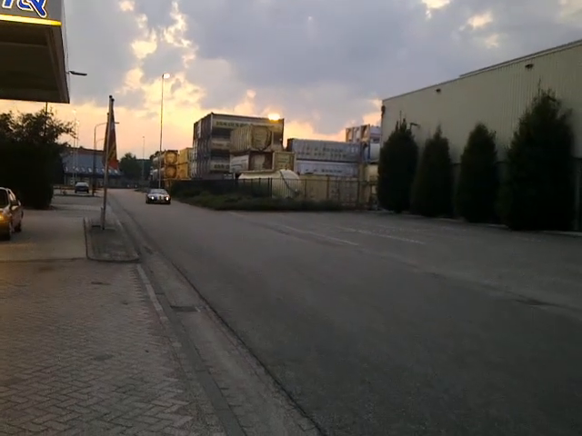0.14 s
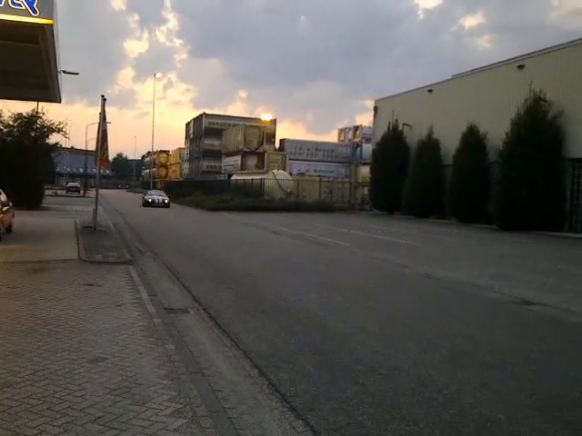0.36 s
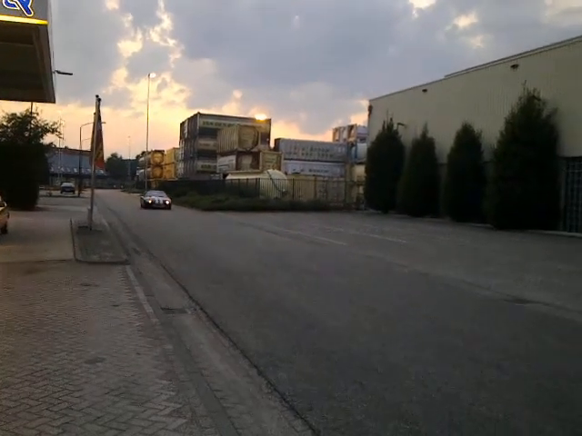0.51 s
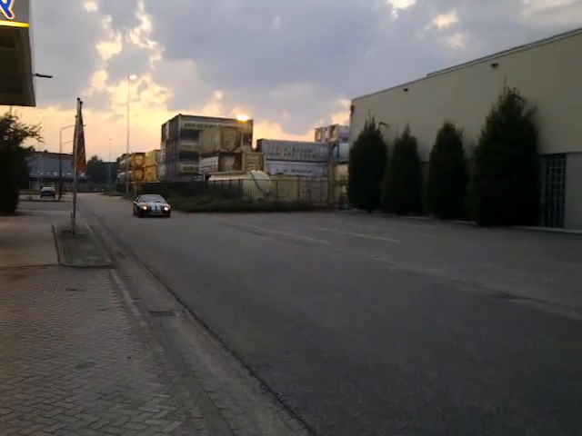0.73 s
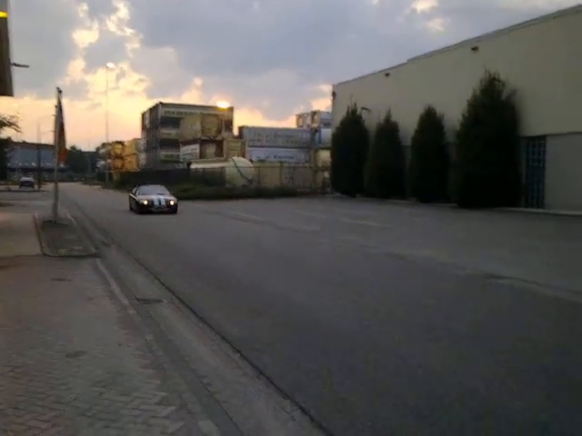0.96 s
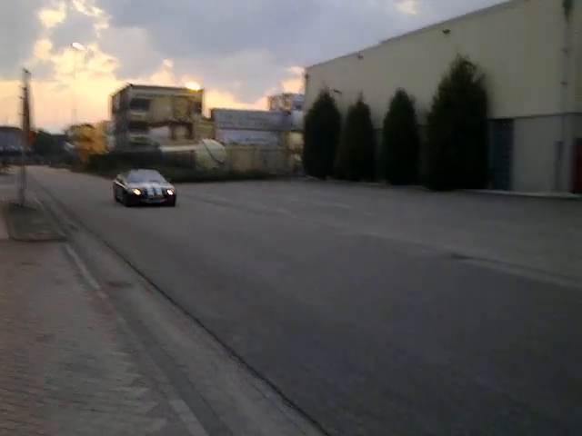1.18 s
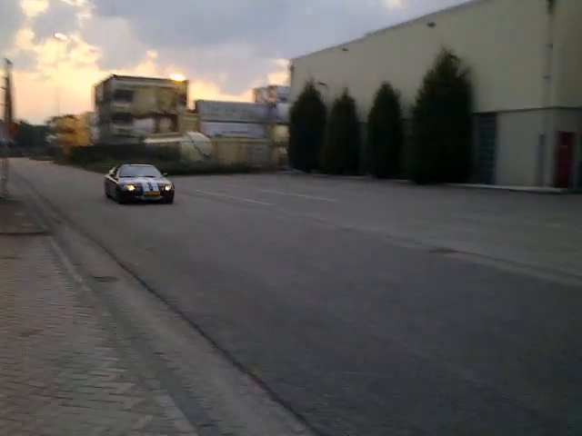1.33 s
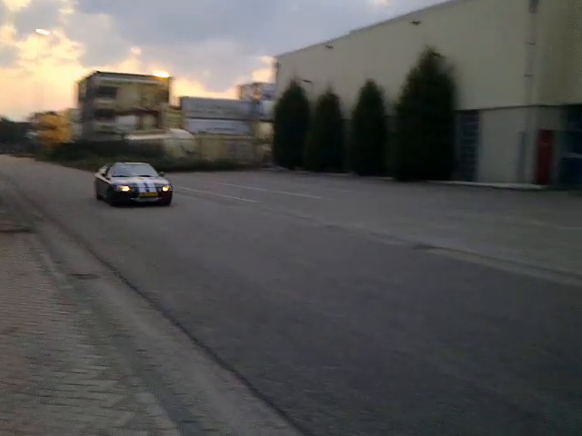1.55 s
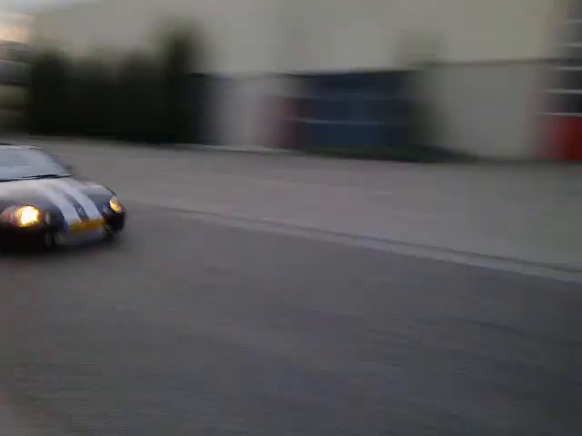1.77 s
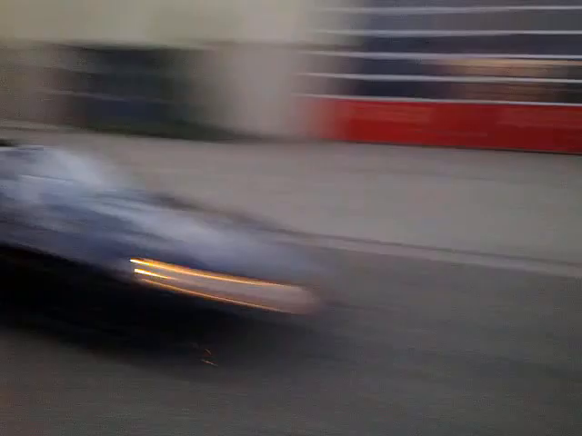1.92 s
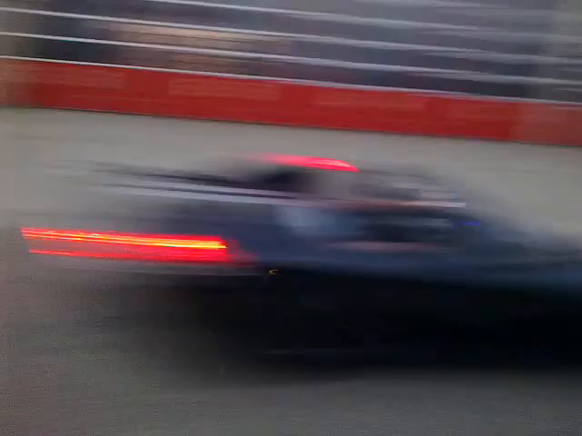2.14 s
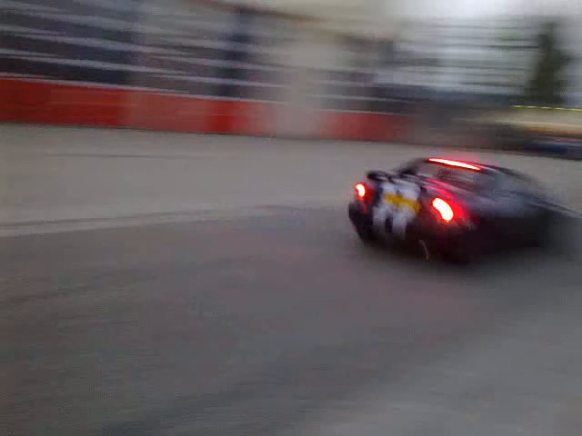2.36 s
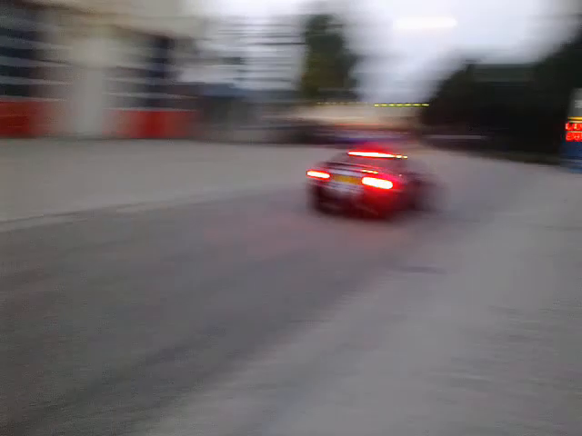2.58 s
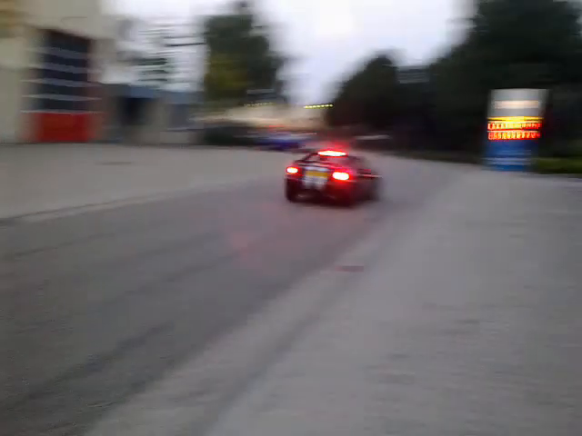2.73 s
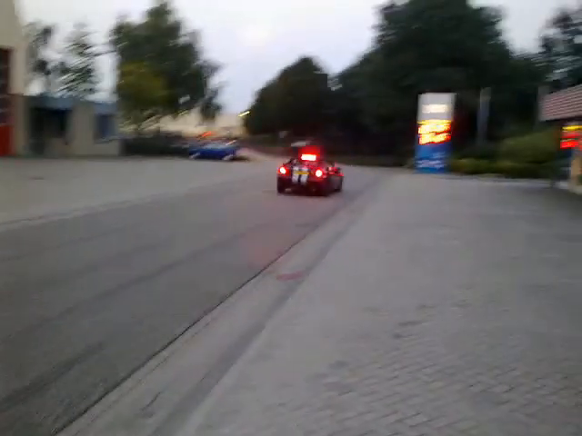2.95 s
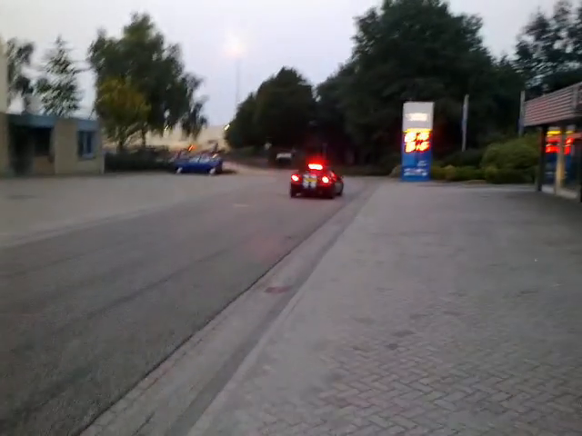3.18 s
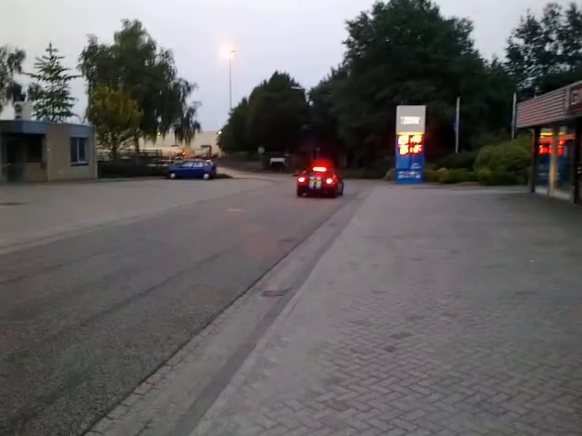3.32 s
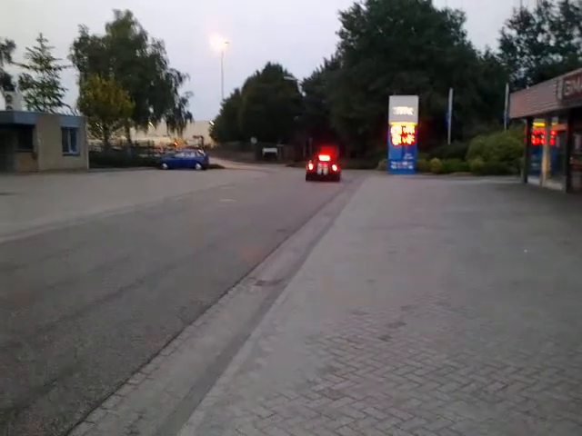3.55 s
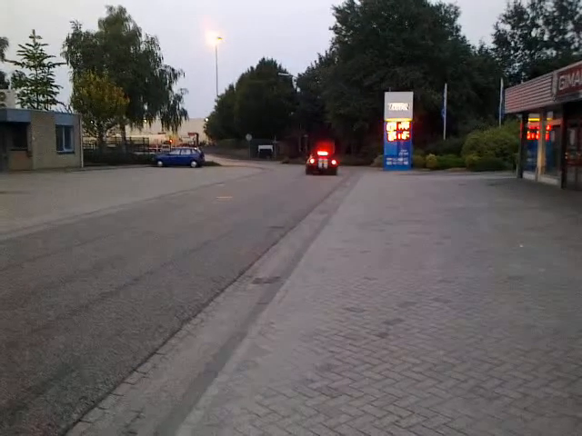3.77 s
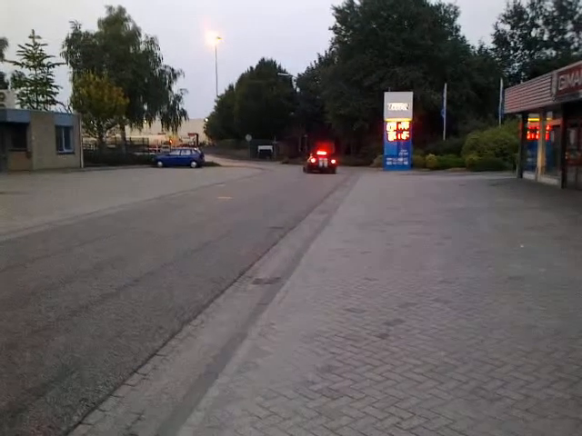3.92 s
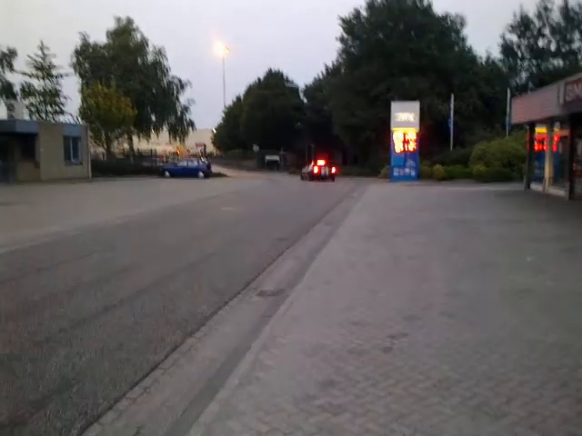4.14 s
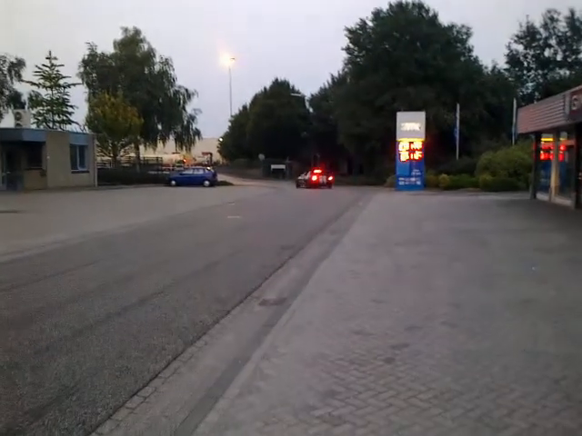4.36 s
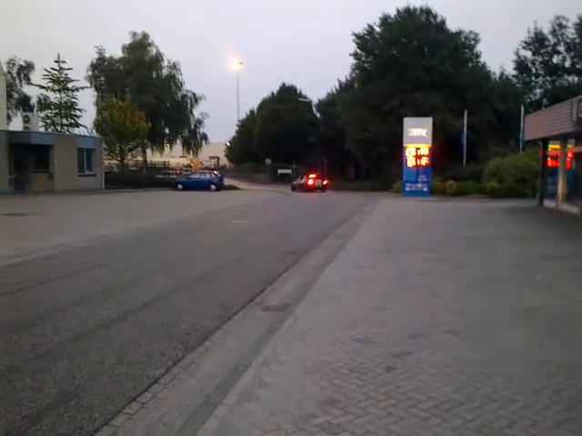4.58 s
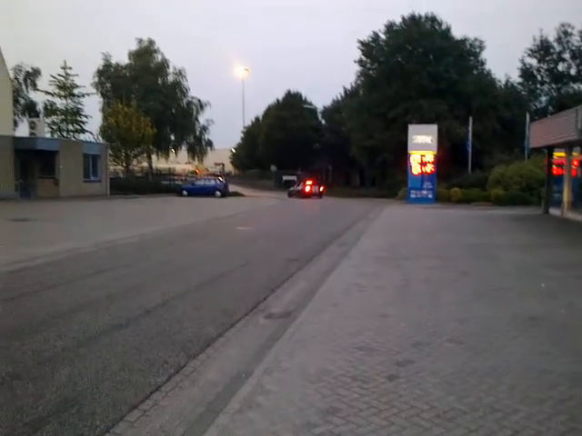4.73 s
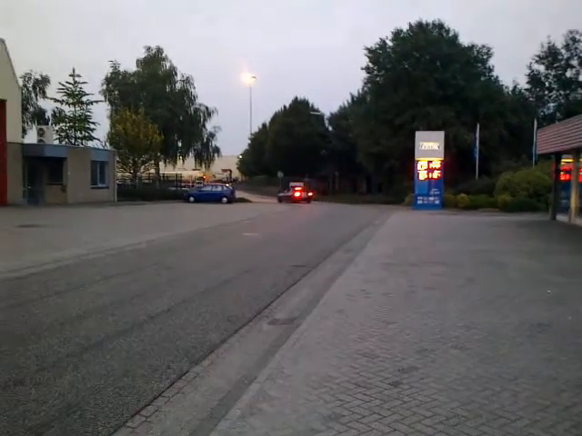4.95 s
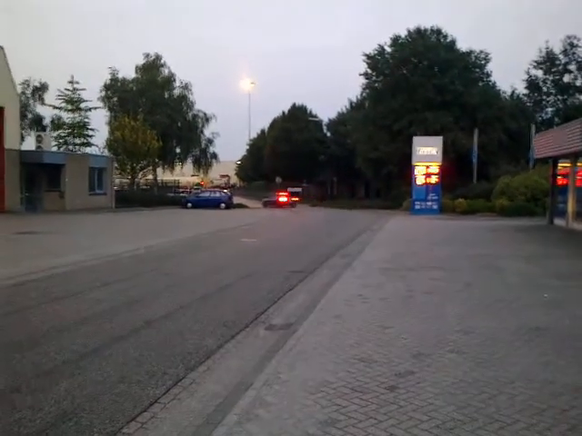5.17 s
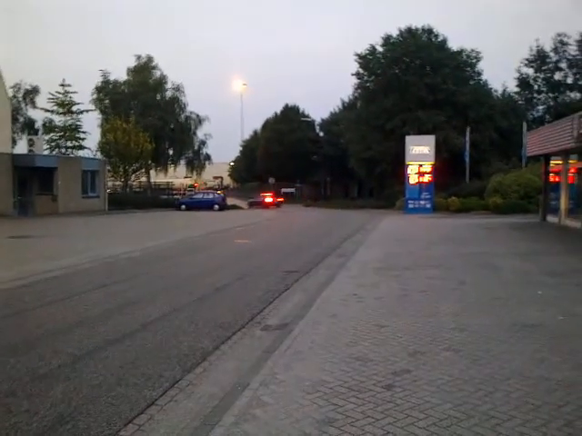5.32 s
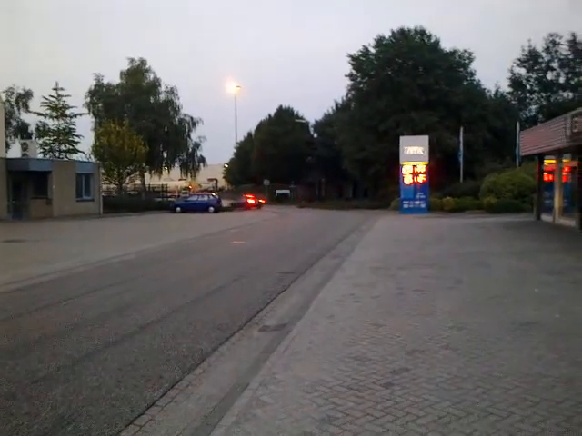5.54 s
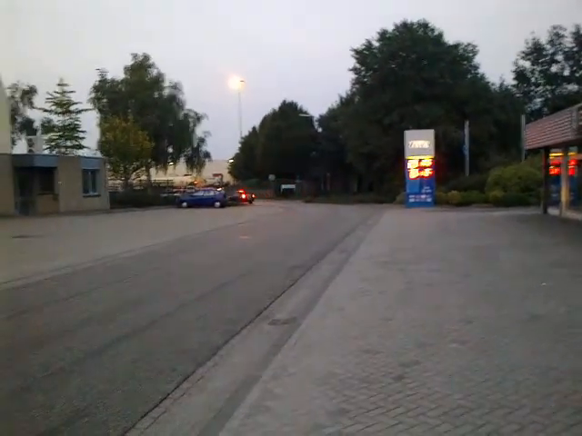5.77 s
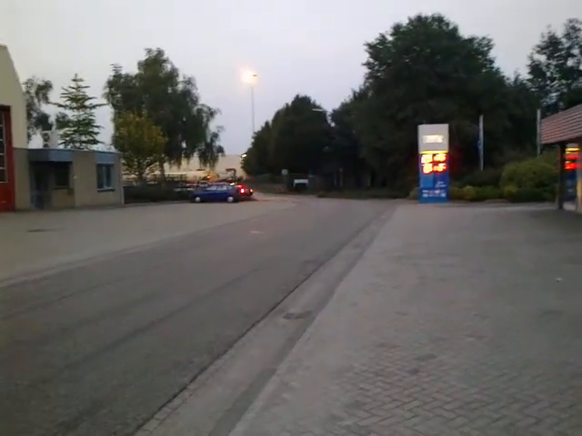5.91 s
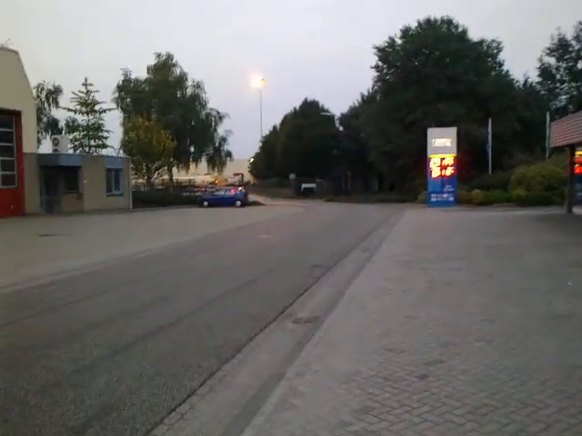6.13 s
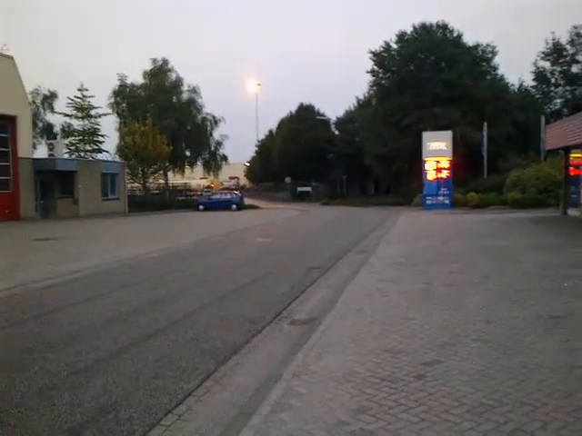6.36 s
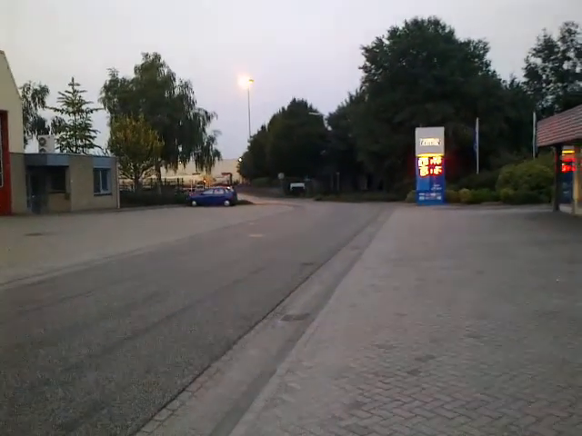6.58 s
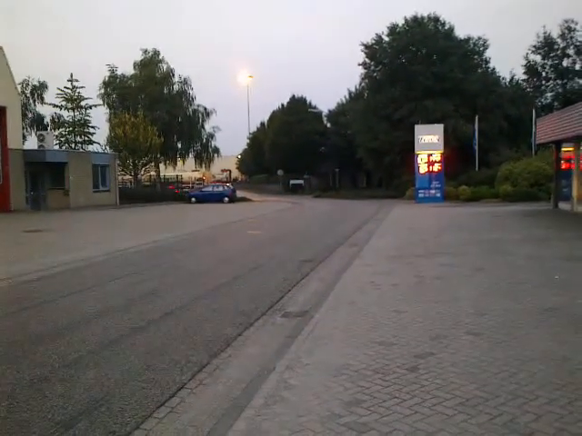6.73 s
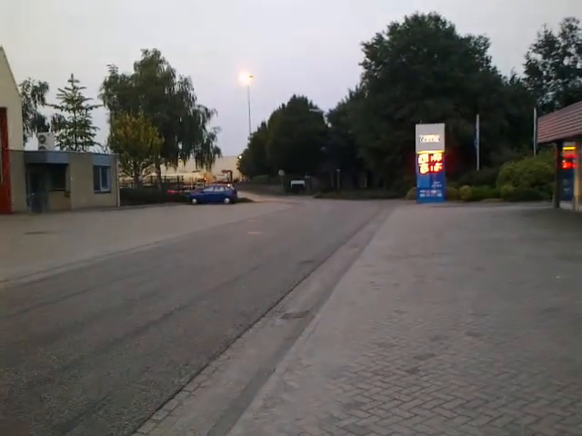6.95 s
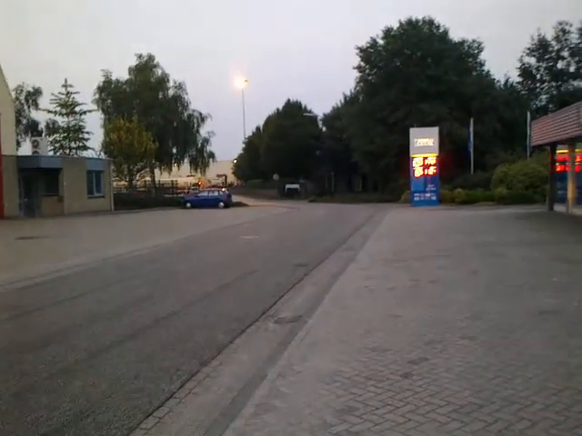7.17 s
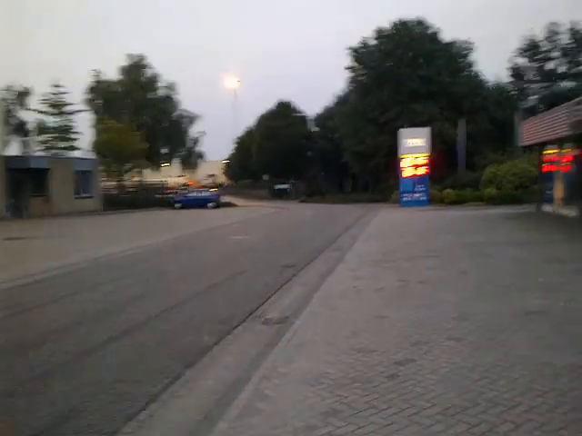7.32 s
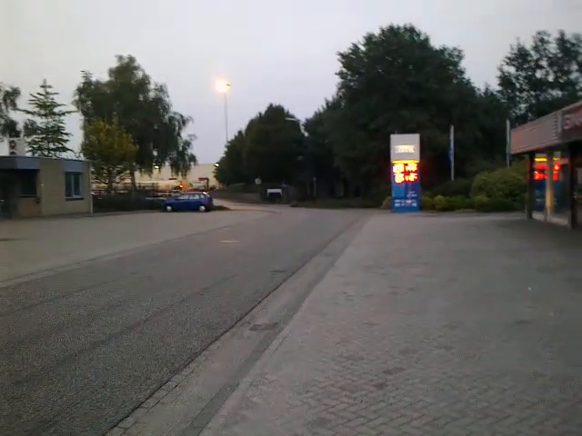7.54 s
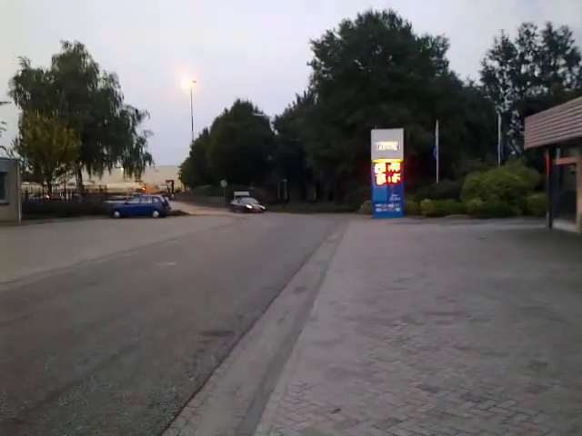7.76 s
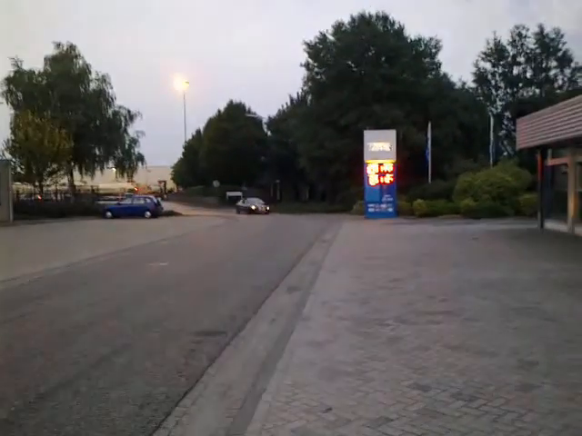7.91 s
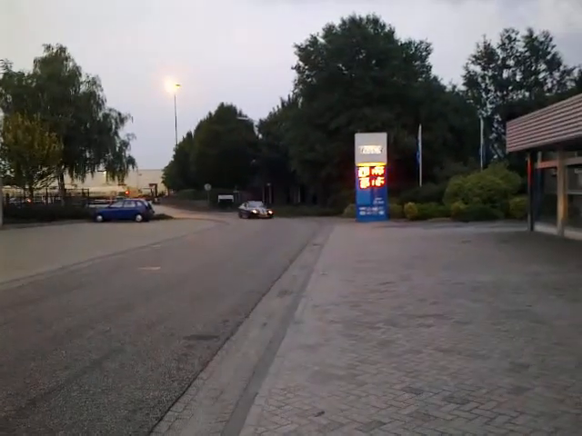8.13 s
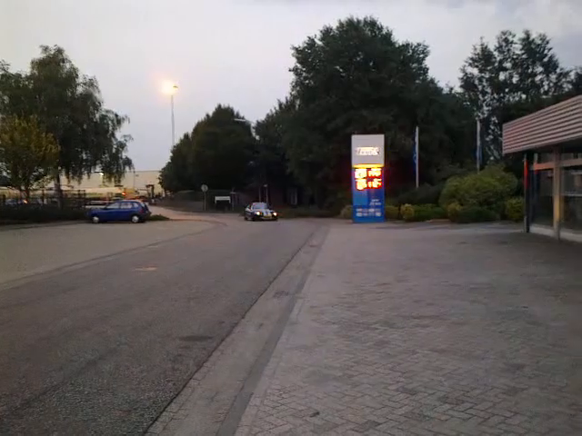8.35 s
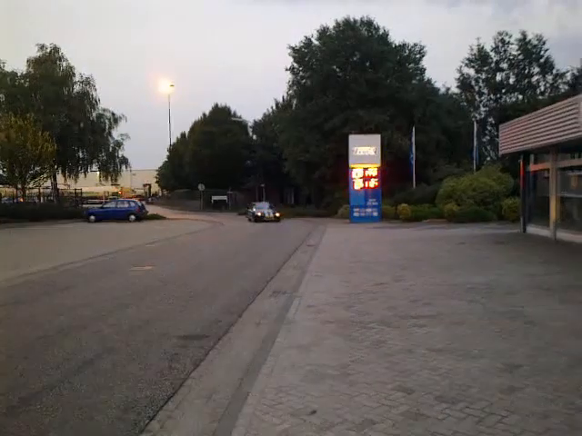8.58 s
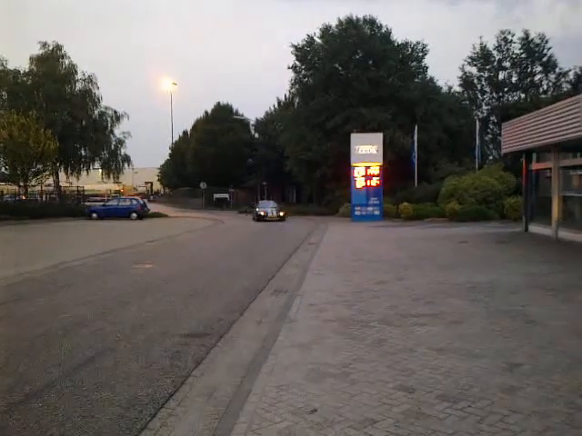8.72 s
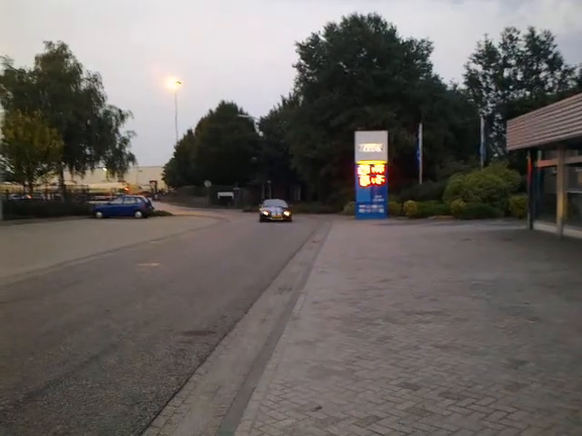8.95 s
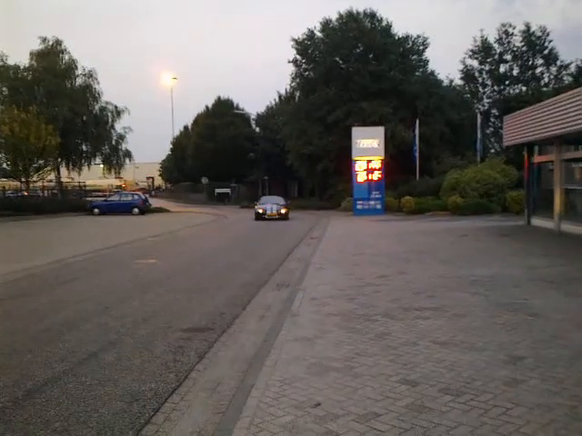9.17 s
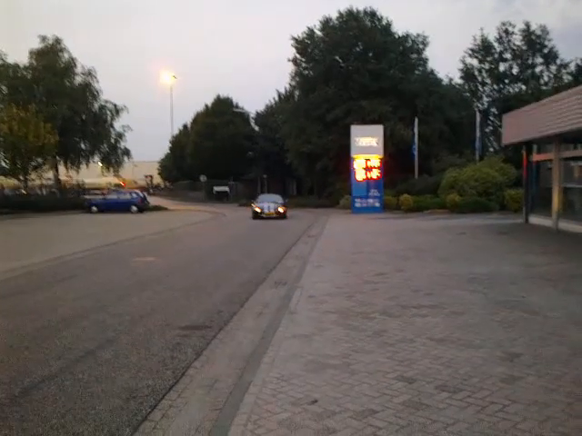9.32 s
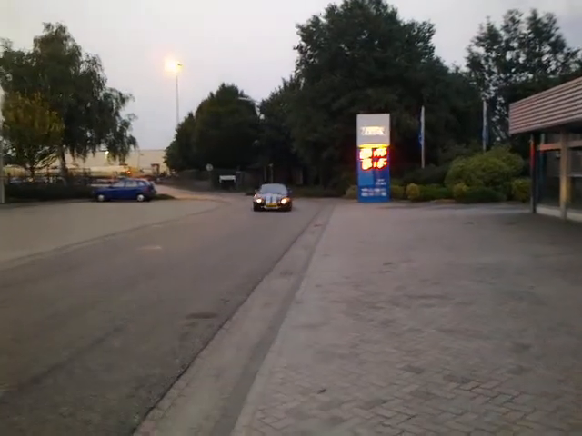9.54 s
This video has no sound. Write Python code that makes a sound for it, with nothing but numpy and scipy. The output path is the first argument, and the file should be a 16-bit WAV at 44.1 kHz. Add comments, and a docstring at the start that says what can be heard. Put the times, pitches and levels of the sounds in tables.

```python
"""A turbocharged four-cylinder car comes head-on down an industrial street, passes close by, slows,
turns far off and pulls away; after a short splice of near-silence it returns with falling revs. Its exhaust
booms as sines on the firing rate, over a rush of tyres and air in filtered noise. The turbo chirps, tyres
scrub and a brake sings as gliding tones and narrow noise; the hand-held camera at the microphone whines and
is bumped and rubbed, over the hum of the yard."""
import sys
import numpy as np
from scipy import signal
from scipy.fft import irfft, next_fast_len
from scipy.io import wavfile

SR = 44100
rng = np.random.default_rng(int(sys.argv[2]) if len(sys.argv) > 2 else 0)


def transcribe(signal):
    """Save signal, clipped to [-1, 1], as a 16-bit WAV file at the path in sys.argv[1]."""
    frames = np.atleast_2d(signal).T
    limited = np.clip(frames, -1, 1)
    pcm = np.round(limited * 32767).astype(np.int16)
    wavfile.write(sys.argv[1], SR, pcm)


N = 427329
TIME = np.arange(N) / SR
SIZE = next_fast_len(N, True)
FREQ = np.maximum(np.arange(SIZE // 2 + 1) * SR / SIZE, 1)   # Hz

# Firing rate as the car passes and slows, pulls away, and comes back. Each row: time in seconds, rate in Hz.
REVS_PASSING = [(0, 275.9), (.25, 250.5), (.55, 234.4), (.76, 194.9), (1.1, 196.5), (1.52, 202.2),
                (1.8, 197.2), (2, 184.6), (2.48, 136.4), (2.7, 130.2), (2.98, 115.4), (3.2, 113.4),
                (3.61, 89.68), (4.14, 69.37)]
REVS_LEAVING = [(4.5, 83.95), (4.88, 109.4), (5.08, 122.5), (5.45, 116.8), (5.8, 113.5), (6.5, 102.7),
                (7.13, 97.17), (7.55, 78)]
REVS_RETURNING = [(7.75, 223.3), (8, 204.2), (8.3, 182.6), (8.6, 163), (9.12, 135.6), (9.291, 129),
                  (9.4, 119.6), (9.69, 105.9)]
# Strength of the exhaust boom on the same stretches. Each row: time in seconds, level in dB.
BOOM_PASSING = [(0, -24.5), (.35, -33), (.62, -26.5), (1.48, -26.5), (1.66, -25.5), (2.1, -15.5),
                (2.5, -22.5), (3.4, -28), (4.05, -42.5)]
BOOM_LEAVING = [(4.6, -47.5), (4.88, -25.5), (5.68, -25.5), (6.1, -33), (6.65, -31.5), (7.05, -39.5),
                (7.3, -52), (7.56, -39.5)]
BOOM_RETURNING = [(7.75, -25.5), (7.92, -17.5), (8.23, -18), (8.579, -20.5), (8.8, -25.5), (9.27, -25.5),
                  (9.69, -37.5)]
# The boom fades briefly where an echo cancels it.
# Each row: centre in seconds, half length in seconds, change in dB (one row is a rise).
BOOM_FADES = [(.53, 0.0096, -11.5), (0.691, 0.0314, -7.5), (0.951, 0.069, -10.5), (1.099, 0.0582, -10),
              (1.255, 0.016, -15.5), (1.377, 0.0423, -18), (1.49, .025, -15), (1.571, 0.043, -21.5),
              (1.912, 0.0233, -13), (2.051, .015, -4.5), (2.159, 0.0167, -13), (2.281, .03, -19.5),
              (2.868, .06, -4), (3.159, .03, -19), (3.245, 0.0196, -15.5), (3.481, 0.022, -9),
              (3.689, 0.049, -12), (5.12, 0.135, -6.5), (5.46, 0.066, -16.5), (5.899, .12, 3),
              (6.18, 0.046, -15), (6.39, 0.047, -10), (7.832, 0.02522, -2), (8.051, 0.022, -1.5),
              (8.275, 0.031, -6.5), (8.414, 0.109, -19.5), (8.686, 0.0715, -9.5), (8.88, 0.0463, -8),
              (9.38, 0.0518, -15)]
# An overtone swells where an echo supports it.
# Each row: centre in seconds, half length in seconds, harmonic number, level in dB before its trim.
OVERTONE_SWELLS = [(0.031, 0.061, 3, -31.5), (1.25, 0.34, 2, -30), (1.445, 0.37, 3, -31.5),
                   (2.17, 0.222, 2, -28), (3.55, 0.1628, 2, -33), (4.171, 0.28, 2, -27),
                   (4.867, .15, 3, -35), (6.45, 0.19, 2, -37.5), (7.399, .11, 2, -38.5),
                   (5.15, .12, 2, -41), (8.053, 0.34, 2, -39.5), (8.299, 0.5, 3, -39),
                   (9.018, 0.36, 2, -34), (9.52, 0.136, 3, -34.5)]
SECOND_DB, THIRD_DB = -45, -45.5   # resting level of the overtones, before their trims
# Growl of unequal cylinders. Each row: multiple of the firing rate, level in dB against the rush's body
# before the engine's load is added.
GROWL = [(.5, -27.5), (.75, -24), (1.25, -17.5), (1.5, -15), (1.75, -20.5), (2.25, -17.5), (2.5, -25.5),
         (2.75, -19), (3.25, -23), (3.5, -16), (4, -16), (4.5, -13.5), (5, -15.5), (5.25, -21.5),
         (6, -11.5), (6.5, -17.5), (7, -16.5), (8, -19.5), (9, -20)]
# More growl under load, less when coasting. Each row: time in seconds, growl change in dB.
LOAD = [(0, 4), (1.3, -2.5), (2.1, -11), (2.8, -10.5), (4, -11.5), (4.8, -4), (7, 1.5), (7.75, -1),
        (9.69, 5.5)]
# Late echoes of the exhaust off far buildings; they carry the earlier pitch and beat with the boom.
# Each row: delay in seconds, level in dB.
LATE_ECHOES = [(.11, -21.5), (.19, -17), (0.309, -17.5), (0.501, -22)]

# Borders of the rush's four bands: body, tread, hiss and air. A single row of frequencies in Hz.
RUSH_EDGES_HZ = [420, 1050, 2600, 6500, 15500]
# Colour of the rush from the front, alongside, just past, from behind, in the turn, far off and returning.
# Each row: frequency in Hz, gain in dB; only the shape within each band counts.
FRONT = [(400, -24), (480, -16.5), (620, -9), (950, -11), (1250, -3.5), (1800, -3.5), (2300, -8),
         (2650, -13.5), (3000, -8.5), (3700, -12), (4300, -16), (5800, -27), (7500, -21.5), (9800, -29),
         (12000, -32.5), (15500, -45.5)]
BESIDE = [(240, -40), (400, -5.5), (481, -13.5), (569, -4.5), (705, -6), (860, 3), (1100, -11), (1300, -3),
          (1490, -3), (2220, -10.5), (2840, -18), (3910, -17), (6680, -31), (11100, -29), (15500, -39.5)]
PAST = [(240, -37), (400, -13), (595, -12.5), (873, -3.5), (1300, -8), (1540, 0.5), (1710, 0.5),
        (2060, -7.5), (2320, -4), (3850, -24), (5070, -24), (6480, -33.5), (8280, -35), (11500, -41.5),
        (15500, -50.5)]
BEHIND = [(400, -4), (470, -15), (650, -8.5), (940, -9.5), (1610, -2), (2360, -11), (2710, -13),
          (3680, -23.5), (4490, -35), (5730, -37), (7000, -47), (10500, -49.5), (13000, -66), (15500, -73)]
TURNING = [(400, -18.5), (500, -0.5), (750, 5.5), (1000, 2), (1500, 2), (2300, -6.5), (2700, -10.5),
           (3800, -19.5), (4900, -25.5), (7000, -36.5), (9000, -42.5), (11000, -41), (13000, -49.5),
           (15500, -56)]
FAR = [(400, -7), (480, -12.5), (720, -5.5), (1050, -12), (1400, -7.5), (2050, -7.5), (2550, -14.5),
       (3300, -19), (4400, -23.5), (5700, -30), (6600, -37), (9000, -36), (13000, -54.5), (15500, -52)]
RETURNING = [(240, -24.5), (400, -9), (452, -11), (847, -1.5), (1000, -9.5), (1400, -2.5), (2250, -8.5),
             (2510, -8), (2750, -12), (2970, -12), (4840, -22.5), (5150, -25), (6380, -31.5), (9210, -47),
             (15500, -49)]
# When each of those sides turns to the microphone. Each row: begins in seconds, fully there in seconds,
# body in dB and hiss in dB, both against the tread band.
SIDES = [(-1, 0, -4.5, -9.5), (1.602, 1.79, -5, -11.5), (1.9966, 2, -4.5, -12), (2.5, 3, -5, -12),
         (3.5, 4, -5, -10.5), (4.5, 5.5, -3.5, -17), (7.5, 8, -3, -9.5)]
# The rush's tread band, drawn for the car's distance and speed.
# Each row: time in seconds, level in dB before the band trim.
RUSH_GOING = [(0, -29), (.8, -27.5), (1.6, -22.5), (1.92, -18), (2.35, -23.5), (2.75, -29), (3.4, -32),
              (3.9, -32.5), (4.3, -32), (4.7, -35), (5.3, -39), (5.95, -46), (7.55, -46.5)]
RUSH_RETURNING = [(7.75, -27), (8.35, -32.5), (8.85, -36.5), (9.69, -38.5)]
# The rush's air band, drawn lower where the throttle closes and once the car has passed.
# Each row: time in seconds, level in dB before the band trim.
TREBLE_GOING = [(0, -41.5), (.54, -56.5), (.62, -45.5), (1.25, -43), (1.57, -39), (1.64, -43), (1.7, -40.5),
                (2, -43.5), (2.25, -52.5), (2.55, -58), (2.9, -60.5), (3.12, -71), (3.7, -63),
                (4.45, -59.5), (4.85, -70), (5.3, -67), (5.8, -87), (6.45, -72), (7.55, -70)]
TREBLE_RETURNING = [(7.75, -51), (8.55, -53.5), (8.9, -58), (9.69, -60)]
HISS_FLOOR_DB = -54.5   # hiss of the street, before the band trim
# The throttle closes and the boost pressure vents.
# A single row of levels in dB, before the band trims: body, tread, hiss, air.
BLOW_OFF_DB = [-54, -26, -27, -40.5]
BLOW_OFF_S, BLOW_OFF_DECAY_S = 0.0594, 0.293
# Echoes off the nearby walls, longest when the car is abreast.
# Each row: time in seconds, near wall's delay in seconds, far wall's delay in seconds.
ECHO_DELAYS = [(0, 0.00458, 0.01186), (1.4, 0.00838, 0.01807), (2.1, 0.01474, 0.0346),
               (2.8, 0.00857, 0.0184), (4.5, .0052, .014), (7.6, 0.004417, 0.01103),
               (9.69, 0.0057, 0.01405)]
# Colour of the road's low noise. Each row: frequency in Hz, relative gain in dB.
RUMBLE = [(25, 3), (60, -3.5), (110, 8.5), (200, 15), (330, 14.5), (420, 7), (600, -29.5), (9000, -27.5),
          (15500, -32.5)]
RUMBLE_UNDER_BODY_DB, STREET_RUMBLE_DB = -5.5, -48.5

# Steady hum of the yard. Each row: frequency in Hz, level in dB.
HUM = [(60, -56), (351.5, -52), (702.6, -64), (2030, -58), (2935, -68), (4290, -73)]
# The camera's whine: a faint comb of lines, strongest around one pitch.
# Each row: time in seconds, change in dB to all the lines.
WHINE_DB = [(2.5, -12), (3.5, -13), (5, 1.5), (7.5, 5), (7.8, -7)]
WHINE_SPACING_HZ, WHINE_CENTRE_HZ = 256.02, 12700
WHINE_SPREAD_HZ = 1900   # the lines lose 6 dB for each spread away from the centre
WHINE_LINE_DB, WHINE_UNEVEN_DB = -88.5, 3.5   # central line before changes, chance spread between lines

# Gliding whistles of turbo, belt, intake and tread. Each row: time in seconds, pitch in Hz, level in dB.
TURBO_CHIRP = [(.04, 4660, -55), (.08, 4550, -35), (.15, 4600, -43), (.22, 4700, -38), (.28, 4190, -32),
               (.335, 3775, -29), (.4, 3550, -35), (.47, 3124, -39.5), (.54, 2886, -50.5)]   # its level is before the flutter
BELT_WHINE = [(.45, 3790, -69), (.75, 3800, -47), (1.2, 3780, -51), (1.55, 3735, -46.5), (1.75, 3760, -59)]
INTAKE_HISS = [(.4, 4523, -71.5), (.65, 4553, -47.5), (1.2, 4567, -58), (1.6, 4705, -45),
               (1.85, 4720, -46.5)]
TURBO_BOOST = [(.54, 7700, -70), (.63, 8000, -46), (.8, 7950, -44.5), (1, 8100, -43.5), (1.25, 8000, -62.5),
               (1.55, 8100, -43), (1.68, 8110, -70)]
TREAD_HOWL = [(.6, 1209, -39.5), (1.1, 1220, -34), (1.5, 1279, -29), (1.85, 1430, -27), (2.1, 1561, -32),
              (2.3, 1718, -31.5), (2.55, 1707, -47.5), (3, 1599, -58), (3.4, 1530, -60)]
# Puffs of air on the microphone. Each row: centre in seconds, spread in seconds, level in dB.
GUSTS = [(1.81, .025, -30.5), (1.88, .02, -26.5), (2.1, .1, -38.5), (6.9, .06, -43)]
# Grit flicked by the tyres. Each row: start in seconds, level in dB, ring in Hz.
GRIT = [(3.62, -50, 6098), (3.794, -32.5, 2606), (3.795, -41.5, 6017), (3.808, -55, 6600),
        (3.838, -40, 4670), (4.1, -48, 6508), (4.51, -51, 5240)]
# Tyres and brake singing. Each row: time in seconds, pitch in Hz, level in dB.
TYRE_SCRUB = [(3.8, 1350, -36), (3.98, 1300, -37.5), (4.12, 1280, -30.5), (4.21, 1219, -25.5),
              (4.32, 1260, -33.5), (4.47, 1268, -36), (4.62, 1305, -50.5)]
TYRE_CHIRP = [(8.03, 1433, -64), (8.11, 1403, -31.5), (8.18, 1405, -35), (8.22, 1410, -19.5),
              (8.25, 1427, -34.5), (8.33, 1440, -52)]
BRAKE_SQUEAK = [(4.29, 8500, -85), (4.35, 8750, -67), (4.42, 9000, -71), (4.47, 8650, -67.5),
                (4.51, 8000, -66), (4.55, 7800, -90)]
# Bumps on the camera. Each row: time in seconds, push in dB, push width in seconds, body ring in dB,
# tick in dB; push and ring are before the dulling low-pass.
BUMPS = [(5.225, -10.5, 0.001012, -13, -45.5), (7.297, -41, 0.000995, -27.5, -57.5),
         (7.313, -24.5, 0.00091, -28.5, -55), (7.32, -40, 0.0012, -34.5, -43),
         (7.326, -36.5, 0.00082, -26, -56), (7.3315, -28.5, 0.00079, -29.5, -62.5),
         (7.3392, -38.5, 0.0011, -21, -58), (7.3416, -17, 0.00073, -37, -62),
         (7.5206, -41.5, 0.00072, -24.5, -56.5), (7.5448, -40, .001, -22, -42.5),
         (7.5492, -13.5, 0.0019, -35, -62.5)]
# Modes of the camera body. Each row: frequency in Hz, level in dB against the ring, decay in seconds.
CAMERA_BODY = [(441.4, -1, 0.00101), (842, -5.5, 0.0016), (1371, 1.5, 0.00054), (2590, -11.5, 0.00107)]
# A finger rubs the camera. Each row: time in seconds, level in dB.
RUB_DB = [(7.29, -80), (7.305, -46), (7.325, -36.5), (7.342, -33), (7.352, -81.5)]
# The splice of near-silence between the two runs. A single row: start in seconds, end in seconds.
SPLICE_S = (7.569, 7.7535)
CUTOFF_HZ = 15750


def from_db(db):
    """Decibels to gain."""
    return 10 ** (np.asarray(db) / 20)


def power_sum(*levels_db):
    """Level of unrelated sounds heard together."""
    return 10 * np.log10(sum(from_db(db) ** 2 for db in levels_db))


def rms_one(x):
    """Scale to unit power."""
    return x / np.sqrt(np.mean(x ** 2) + 1e-20)


def in_time(*tables):
    """The columns of consecutive curve tables, at every sample."""
    s, *columns = np.vstack(tables).T
    return np.array([np.interp(TIME, s, column) for column in columns])


def drift(rate):
    """Smooth chance with spread 1 and about `rate` turns a second, drawn every 100 samples."""
    pole = np.exp(-200 * np.pi * rate / SR)
    chance = rng.standard_normal(N // 100 + 1002)
    slow = signal.lfilter([1], [1, -2 * pole, pole * pole], chance)[1000:]   # skip the filter's start
    return np.interp(np.arange(N) / 100, np.arange(len(slow)), rms_one(slow))


def colour(points):
    """Gain on the frequency grid from (Hz, dB) points, straight in log frequency."""
    hz, db = np.transpose(points)
    return from_db(np.interp(np.log(FREQ), np.log(hz), db))


def noise(gain):
    """Noise of unit power with the given gain at each frequency."""
    spectrum = rng.standard_normal(2 * len(FREQ)).view(complex) * gain
    return rms_one(irfft(spectrum, SIZE)[:N])


def band(low, high):
    """Soft-edged band; neighbours add up to even power."""
    return ((1 + (low / FREQ) ** 12) * (1 + (FREQ / high) ** 12)) ** -.5


def burst(s, decay_s):
    """An envelope that jumps to 1 at time s and dies away."""
    return (TIME >= s) * np.exp(-np.clip((TIME - s) / decay_s, 0, 50))


def bell(s, half_length_s):
    """A smooth rise to 1 at time s and back."""
    return np.exp(-np.minimum(((TIME - s) / half_length_s) ** 2, 50))


def boom_levels():
    """Levels of the boom and its two overtones, which swell as the car moves among the walls."""
    first_db, = in_time(BOOM_PASSING, BOOM_LEAVING, BOOM_RETURNING)
    powers = {2: from_db(SECOND_DB) ** 2, 3: from_db(THIRD_DB) ** 2}
    for s, half_length, harmonic, db in OVERTONE_SWELLS:
        powers[harmonic] = powers[harmonic] + (from_db(db) * bell(s, half_length)) ** 2
    return first_db, 10 * np.log10(powers[2]), 10 * np.log10(powers[3])


def boom_fading():
    """Gain of the boom through its brief fades."""
    gains = [1 - (1 - from_db(db)) * bell(s, half_length) for s, half_length, db in BOOM_FADES]
    return np.prod(gains, axis=0)


def far_buildings(x):
    """The sound with its late echoes, delayed copies whose source eases in at the start."""
    eased = x * np.minimum(TIME / .05, 1)
    return x + sum(from_db(db) * np.interp(TIME - delay, TIME, eased) for delay, db in LATE_ECHOES)


def growl(turn, flutter=.41, wobble=.406):
    """Unequal cylinders add orders at quarter steps of the firing rate, each wavering by itself."""
    orders = np.zeros(N)
    for multiple, db in GROWL:
        # reflections from the walls make each order swell, fade and waver
        phase = rng.uniform(0, 2 * np.pi) + wobble * drift(16.4)
        orders += from_db(db) * (1 + flutter * drift(7)) * np.sin(multiple * turn + phase)
    return orders


def exhaust(firings, harmonics_db, body_db, rough=.07, tone_rough=.281, second_trim_db=-2.5, third_trim_db=-3):
    """Exhaust pulses boom on the firing rate, with two overtones and the growl of unequal cylinders."""
    turn = 2 * np.pi * firings
    first_db, second_db, third_db = harmonics_db
    load_db, = in_time(LOAD)
    boom = from_db(first_db) * (1 + rough * drift(27)) * np.sin(turn)
    second = from_db(second_db + second_trim_db) * (1 + tone_rough * drift(20)) * np.sin(2 * turn)
    third = from_db(third_db + third_trim_db) * (1 + tone_rough * drift(18)) * np.sin(3 * turn)
    upper = second + third + from_db(body_db + load_db) * growl(turn)
    return np.sqrt(2) * (boom_fading() * far_buildings(boom) + far_buildings(upper))


def side_shares():
    """How much of each side of the car faces the microphone; the shares add up to 1."""
    reached = [np.clip((TIME - begin) / (full - begin), 0, 1) for begin, full, _, _ in SIDES]
    return np.maximum(-np.diff(reached + [np.zeros(N)], axis=0), 0)


def rush_levels():
    """Levels of the rush's body, tread, hiss and air; the blow-off valve adds one dying gust."""
    tread_db, = in_time(RUSH_GOING, RUSH_RETURNING)
    air_db, = in_time(TREBLE_GOING, TREBLE_RETURNING)
    body_db, hiss_db = tread_db + np.array(SIDES)[:, 2:].T @ side_shares()
    venting_db = 20 * np.log10(burst(BLOW_OFF_S, BLOW_OFF_DECAY_S) + 1e-9)
    rolling_db = [body_db, tread_db, power_sum(hiss_db, HISS_FLOOR_DB), air_db]
    return [power_sum(db, vent_db + venting_db) for db, vent_db in zip(rolling_db, BLOW_OFF_DB)]


def rush(firings, levels_db, throb=.065, patchy_db=.79, trims_db=(-1.2, -.8, -.5, -.5)):
    """Tyre and air noise changes colour as the car turns its sides, pulsing a little with the engine."""
    colours = [colour(view) for view in (FRONT, BESIDE, PAST, BEHIND, TURNING, FAR, RETURNING)]
    shares = np.sqrt(side_shares())   # crossfade at even power
    out = np.zeros(N)
    for low, high, db, trim_db in zip(RUSH_EDGES_HZ, RUSH_EDGES_HZ[1:], levels_db, trims_db):
        edges = band(low, high)
        sound = sum(share * noise(gain * edges) for share, gain in zip(shares, colours))
        out += from_db(db + trim_db + patchy_db * drift(25)) * sound
    # once a firing, once a crank turn, once a full engine cycle
    pulsing = np.cos(2 * np.pi * firings) + .47 * np.cos(np.pi * firings) + .5 * np.cos(np.pi * firings / 2)
    return out * (1 + throb * pulsing)


def walls(x, echo=.196):
    """Echoes off the nearby buildings, two moving delays, comb the sound."""
    echoes = sum(np.interp(TIME - delay, TIME, x, left=0) for delay in in_time(ECHO_DELAYS))
    return (x + echo * echoes) / np.sqrt(1 + 2 * echo ** 2)


def rumble(body_db):
    """Low noise of the road follows the body of the rush, over that of the street."""
    level_db = power_sum(body_db + RUMBLE_UNDER_BODY_DB, STREET_RUMBLE_DB)
    return from_db(level_db) * noise(colour(RUMBLE))


def steady(lines, waver):
    """Fixed pitches that waver in strength."""
    tones = [from_db(db) * (1 + waver * drift(9.8)) * np.sin(2 * np.pi * hz * TIME) for hz, db in lines]
    return np.sqrt(2) * sum(tones)


def yard_hum():
    """Steady tones stand in the yard behind the car."""
    return steady(HUM, waver=.49)


def camera_whine():
    """Evenly spaced thin tones of uneven strength, close to the microphone."""
    hz = WHINE_SPACING_HZ * np.arange(39, 60)
    slope_db = -6 * abs(hz - WHINE_CENTRE_HZ) / WHINE_SPREAD_HZ
    db = WHINE_LINE_DB + slope_db + WHINE_UNEVEN_DB * rng.standard_normal(len(hz))
    level_db, = in_time(WHINE_DB)
    return from_db(level_db) * steady(zip(hz, db), waver=.1)


def whistle(rows, width_hz):
    """Air or rubber sings in a narrow, unsteady band around a gliding pitch."""
    hz, db = in_time(rows)
    sounding = (TIME > rows[0][0]) & (TIME < rows[-1][0])
    turn = 2 * np.pi * np.cumsum(hz) / SR
    narrow = 1 / (1 + (FREQ / width_hz) ** 4)
    # slow noise on both phases of the tone spreads it into a band
    return sounding * from_db(db) * (noise(narrow) * np.cos(turn) + noise(narrow) * np.sin(turn))


def turbo(flutter_db=2.5):
    """The turbo winds down with a fluttering chirp and spools up again in a broader whistle."""
    flutter = from_db(flutter_db * drift(24.77) + 1.5)
    return whistle(TURBO_CHIRP, width_hz=275) * flutter + whistle(TURBO_BOOST, width_hz=560)


def engine_bay():
    """A belt whines thinly and the intake hisses as the car draws near."""
    return whistle(BELT_WHINE, width_hz=21) + whistle(INTAKE_HISS, width_hz=91)


def tread_howl():
    """The tread howls in passing, a narrow band gliding in pitch."""
    return whistle(TREAD_HOWL, width_hz=137)


def gusts(top_hz=100):
    """Puffs of air buffet the microphone with low noise."""
    strength = sum(from_db(db) * np.exp(-.5 * ((TIME - s) / spread) ** 2) for s, spread, db in GUSTS)
    return strength * noise(band(34, top_hz))


def grit(decay_s=.0038, width_hz=700):
    """Small stones click briefly, as dying noise around a ringing pitch."""
    out = np.zeros(N)
    for s, db, hz in GRIT:
        ring = 1 / np.hypot(1, (FREQ - hz) / width_hz)
        out += from_db(db) * burst(s, decay_s) * noise(ring)
    return out


def squeal(rows, width_hz, second_db, third_db):
    """Rubber slipping sideways sings with two weak overtones."""
    out = np.zeros(N)
    for k, drop_db in [(1, 0), (2, second_db), (3, third_db)]:
        partial = [(s, k * hz, db + drop_db) for s, hz, db in rows]
        out += whistle(partial, width_hz * np.sqrt(k))
    return out


def tyre_slip():
    """Tyres scrub in the far turn and chirp once on the way back."""
    scrub = squeal(TYRE_SCRUB, width_hz=126, second_db=-16, third_db=-21.5)
    return scrub + whistle(TYRE_CHIRP, width_hz=123)


def brake():
    """A brake pad sings one thin, pure glide."""
    hz, db = in_time(BRAKE_SQUEAK)
    sounding = (TIME > BRAKE_SQUEAK[0][0]) & (TIME < BRAKE_SQUEAK[-1][0])
    return sounding * from_db(db) * np.sin(2 * np.pi * np.cumsum(hz) / SR)


def bumps(tick_s=.0014, rebound=.154, dull_hz=3200):
    """Each bump pushes the camera body, which swings back and rings dully, with a faint tick on top."""
    knocks, ticks = np.zeros((2, N))
    for s, push_db, width, ring_db, tick_db in BUMPS:
        near = abs(TIME - s) < .04
        age = TIME[near] - s
        u, after = age / width, np.maximum(age, 0)
        knocks[near] += from_db(push_db) * (rebound * np.exp(-(u / 2 - 2) ** 2) - np.exp(-u ** 2))
        for hz, db, decay in CAMERA_BODY:
            knocks[near] += from_db(ring_db + db) * np.exp(-after / decay) * np.sin(2 * np.pi * hz * after)
        ticks[near] += from_db(tick_db) * (age > 0) * np.exp(-after / tick_s)
    low_pass = signal.butter(4, dull_hz, fs=SR, output="sos")
    dull = signal.sosfilt(low_pass, knocks + 1e-18)
    return dull + ticks * noise(band(3500, 12000))


def rub(top_hz=1150):
    """Skin slides over the camera body with a short dull rasp."""
    level_db, = in_time(RUB_DB)
    return from_db(level_db) * noise(band(220, top_hz))


def scene():
    """The engine's firing drives the exhaust and the pulsing of the rush; the rest is laid around it."""
    firing_hz, = in_time(REVS_PASSING, REVS_LEAVING, REVS_RETURNING)
    firings = np.cumsum(firing_hz * (1 + .003542 * drift(15.388))) / SR   # count, with uneven running
    levels_db = rush_levels()
    body_db = levels_db[0]
    car = exhaust(firings, boom_levels(), body_db) + walls(rush(firings, levels_db)) + rumble(body_db)
    car += turbo() + engine_bay() + tread_howl() + grit() + tyre_slip() + brake()
    background = yard_hum() + camera_whine()
    at_microphone = gusts() + bumps() + rub()
    return (car + background + at_microphone)[None]


def record(dry):
    """All sound drops to near-silence at the splice between the two runs; a steep low-pass cuts the top."""
    outside_s = np.maximum(SPLICE_S[0] - TIME, TIME - SPLICE_S[1])
    running = np.clip(outside_s / .003, 0, 1)
    spliced = dry * np.maximum(running, from_db(-78.5))
    steep = signal.ellip(10, .05, 70, CUTOFF_HZ, fs=SR, output="sos")
    return signal.sosfiltfilt(steep, spliced)


dry = scene()
out = record(dry)
transcribe(out)
```